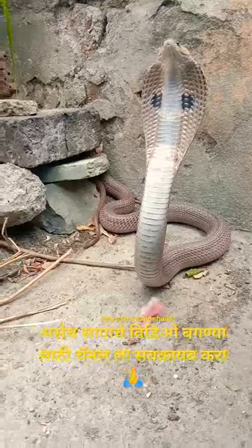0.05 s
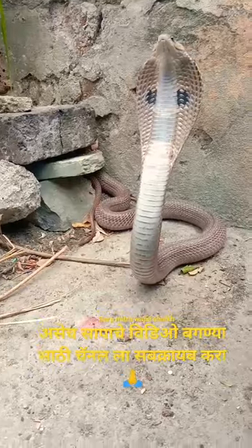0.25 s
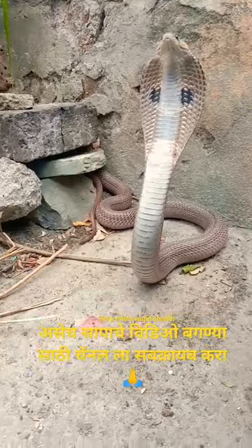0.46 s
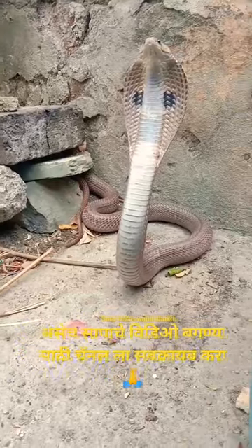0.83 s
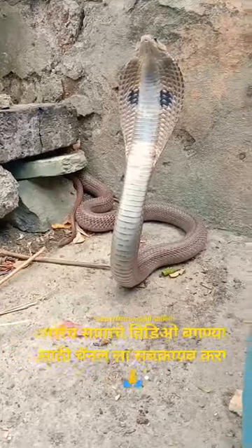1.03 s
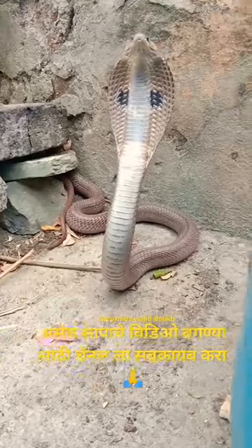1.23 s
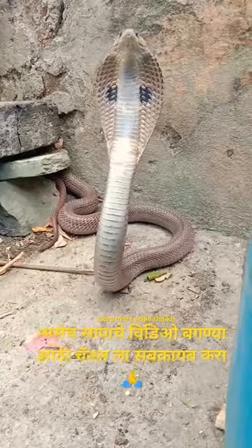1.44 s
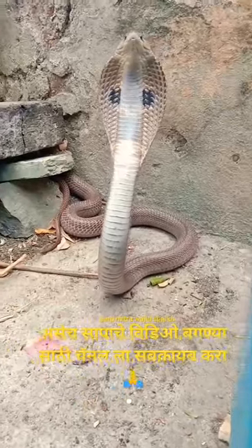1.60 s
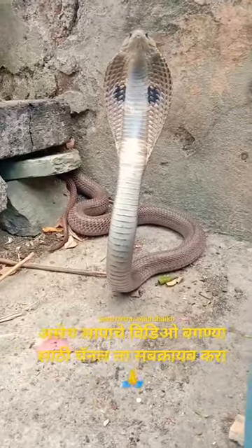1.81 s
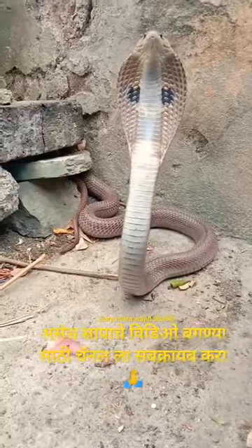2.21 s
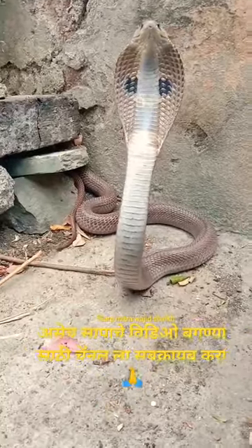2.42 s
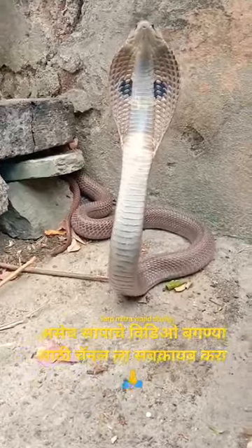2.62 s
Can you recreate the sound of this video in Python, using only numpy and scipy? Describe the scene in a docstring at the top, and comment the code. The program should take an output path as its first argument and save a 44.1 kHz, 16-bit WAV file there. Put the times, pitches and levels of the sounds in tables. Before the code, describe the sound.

A snake's long, airy hiss swells with a hollow, sputtering rasp, then dies away. Short, high bird chirps run through it and just past its end, outdoors by a stone wall, over a faint distant drone.

```python
"""One long, surging hiss from a reared cobra in front of a stone wall, a small bird twittering through it.
The hiss is turbulent air ringing the snake's throat and airway: the throat resonance rises and falls
with the push, and the airway changes shape near the end. The bird's notes are short raspy glides,
echoed by the wall. Underneath lie a quiet yard, a far drone, soft bumps and tiny ticks."""
import sys
import numpy as np
from scipy import signal
from scipy.fft import rfft, irfft, next_fast_len
from scipy.io import wavfile
from scipy.ndimage import map_coordinates

SR = 44100
rng = np.random.default_rng(int(sys.argv[2]) if len(sys.argv) > 2 else 0)


def wrap_up_sound(samples):
    """Save the sound to the file named by the first command line argument, as 16-bit audio."""
    columns = np.atleast_2d(samples).T
    # keep every value between -1 and 1, then stretch to whole-number steps
    tamed = np.clip(columns, -1, 1)
    steps = np.round(tamed * 32767).astype(np.int16)
    wavfile.write(sys.argv[1], SR, steps)


N = 121275


def amp(db):
    """Decibels to gain."""
    return 10 ** (np.asarray(db) / 20)


def unit(x):
    """Scale to rms 1."""
    return x / np.sqrt(np.mean(x ** 2) + 1e-20)


def clock():
    """The time of every sample."""
    return np.arange(N) / SR


def curves(rows):
    """One automation curve for each column after the time."""
    times, *columns = np.transpose(rows)
    return [np.interp(clock(), times, column) for column in columns]


def swells(rows):
    """A gain curve of bell-shaped swells (t/s, half length/s, level/dB)."""
    return sum(amp(db) * np.exp(-((clock() - s) / half) ** 2) for s, half, db in rows)


def wobble(rate):
    """A smooth random curve, rate knots a second."""
    return map_coordinates(rng.standard_normal(8192), [clock() * rate], mode="wrap")


def filtered(x, response):
    """Shape x with a frequency response."""
    size = next_fast_len(N + SR // 2)
    return irfft(rfft(x, size) * response(np.fft.rfftfreq(size, 1 / SR)), size)[:N]


def noise(response):
    """Coloured noise of rms 1."""
    return unit(filtered(rng.standard_normal(N), response))


def colour(points):
    """An EQ curve through (f/Hz, level/dB) points on a log axis."""
    f, db = np.transpose(points)
    return lambda hz: amp(np.interp(np.log(hz + 1), np.log(f + 1), db))


def resonance(hz, centre, width):
    """Gain of a resonance with steep skirts."""
    return (hz * width) ** 2 / ((centre ** 2 - hz ** 2) ** 2 + (hz * width) ** 2)


def ringing_air(modes):
    """Noise ringing a set of resonances (f/Hz, width/Hz, relative level/dB)."""
    def response(hz):
        gains = [amp(db) * resonance(hz, f, width * np.sqrt(2)) ** 2 for f, width, db in modes]
        return np.sqrt(sum(gain ** 2 for gain in gains))
    return noise(response)


def glide(air, ratio):
    """Bend all resonances of the air by a moving pitch ratio."""
    return unit(map_coordinates(air, [np.cumsum(ratio)], mode="wrap"))


def yard():
    """Still outdoor air and a distant low drone."""
    # colour of the air: f/Hz, relative level/dB
    air_colour = [(25, -9), (70, -37), (130, 15.5), (300, -42), (900, 3), (1150, 2), (1900, -2),
                  (3200, 3.5), (3900, -6.5), (5000, 2), (7200, -31), (8000, -19), (10000, -12),
                  (11200, -45), (15500, -19)]
    # the drone's drift: t/s, level/dB
    drone_levels = [(.1, -71), (1.0, -74), (2.0, -70.5), (2.4, -77), (2.75, -78.5)]
    air = amp(-71) * noise(colour(air_colour))
    drone = amp(curves(drone_levels)[0]) * ringing_air([(150.7, 198, 0)])
    return air + drone


def bumps():
    """Soft low bumps of a hand-held microphone."""
    # handling bumps: t/s, half length/s, level/dB
    nudges = [(0.275, 0.025, -59), (0.913, 0.06, -60.5), (2.255, 0.054, -65.5)]
    return swells(nudges) * ringing_air([(93, 92, 0)])


def ticks(t60_s=0.07):
    """Tiny dry ticks: bands of noise that start sharply and die fast."""
    # ticks: t/s, level/dB, f/Hz
    hits = [(2.319, -75, 8000), (2.517, -66, 2500), (2.558, -71, 8500), (2.609, -69, 2500)]
    t = clock()
    return sum((t > s) * amp(db - 60 * np.abs(t - s) / t60_s) * ringing_air([(hz, hz / 2, 0)])
               for s, db, hz in hits)


def wall(x, wall_db, direct_db=-4, t60_s=0.14, delay_s=0.00074):
    """A sound together with the short scattered answer of stone wall and ground."""
    t = np.arange(SR // 3) / SR
    scatter = rng.standard_normal(len(t)) * amp(-60 * t / t60_s) * (t > delay_s)
    answer = signal.fftconvolve(x, scatter)
    answer *= np.linalg.norm(x) / np.linalg.norm(answer)
    return amp(direct_db) * np.pad(x, (0, len(t) - 1)) + amp(wall_db) * answer


def sing(notes, wall_db, arch_hz=149, edge_s=0.0063):
    """Short arched glides, raspy in pitch and level, each answered by the wall."""
    song = np.zeros(N + SR)
    rasp_hz, rasp_db = 470 * wobble(800), 4.5 * wobble(400)  # at roughness 1
    for s, length, start_hz, end_hz, db, rough in notes:
        t = np.arange(int(length * SR)) / SR
        progress = t / length
        at = round(s * SR) + np.arange(len(t))
        arch = arch_hz * (np.sin(np.pi * progress) - .5)
        hz = start_hz + (end_hz - start_hz) * progress + arch + rough * rasp_hz[at % N]
        gate = np.sin(np.pi / 2 * np.clip(np.minimum(t, length - t) / edge_s, 0, 1))
        tone = amp(rough * rasp_db[at % N]) * np.sin(2 * np.pi * np.cumsum(hz) / SR)
        note = wall(amp(db) * unit(gate * tone), wall_db)
        song[at[0]:][:len(note)] += note
    return song[:N]


def bird(chirp_start_hz=3874, chirp_end_hz=4825, chirp_rough=.25):
    """High raspy twitters and four lower, clearer chirps that share one rising glide."""
    # twitters: t/s, length/s, start f/Hz, end f/Hz, level before the wall/dB, roughness
    twitters = [(0.211, 0.042, 5610, 5900, -58, 0.56), (0.394, 0.0089, 5230, 5700, -52, 0.63),
                (0.561, 0.048, 5210, 5270, -55, 0.4), (0.656, 0.018, 5550, 5810, -53, .5),
                (0.863, 0.023, 6000, 6630, -60.5, 0.77), (0.956, 0.025, 5460, 7000, -51.5, 0.75),
                (1.054, 0.024, 5590, 7100, -49, 0.4), (1.323, 0.018, 7300, 7080, -57, 0.15),
                (1.349, 0.012, 5390, 5310, -42, 0), (1.509, 0.05, 6490, 6110, -54, 0.6),
                (1.69, 0.036, 6530, 6040, -56.5, 0.6), (1.869, 0.04, 6730, 6310, -51, 0.49),
                (1.998, 0.017, 6600, 6880, -54, 0.2), (2.107, 0.028, 6370, 6720, -57.5, 0.31),
                (2.211, 0.038, 5896, 6150, -55.5, 0.17), (2.226, 0.032, 6570, 5040, -55.5, 0.58),
                (2.303, 0.036, 3250, 3790, -71, .7), (2.326, 0.033, 7080, 5900, -62, 1.17),
                (2.412, 0.032, 6380, 6330, -58, 0.53), (2.44, 0.032, 6650, 5170, -54, 0.89),
                (2.452, 0.042, 5000, 5140, -55.5, 0.16), (2.595, 0.11, 2763, 2820, -74, 0.27),
                (2.655, 0.083, 8280, 8520, -82, 0.26)]
    # chirps: t/s, length/s, level before the wall/dB
    calls = [(1.258, 0.065, -48.5), (1.438, .085, -49.5), (1.636, .065, -44.5), (1.812, 0.057, -43)]
    chirps = [(s, length, chirp_start_hz, chirp_end_hz, db, chirp_rough) for s, length, db in calls]
    return sing(twitters, wall_db=2) + sing(chirps, wall_db=-1)


def eddies(air, depth_db=6, width_hz=100, life_s=.14, half_depth_hz=11000):
    """Narrow peaks and hollows that come and go in the turbulence, shallower in the treble."""
    spectra = signal.stft(air, SR, nperseg=1024)[2]
    band, frame = np.indices(spectra.shape)
    hz, t = band * SR / 1024, frame * 512 / SR
    field = map_coordinates(rng.standard_normal((400, 64)), [hz / width_hz, t / life_s], mode="wrap")
    ripple_db = depth_db / (1 + (hz / half_depth_hz) ** 2) * np.tanh(field)
    return unit(signal.istft(spectra * amp(ripple_db), SR, nperseg=1024)[1][:N])


def body():
    """Puffs of air through the snake's low body resonances."""
    # puffs: t/s, half length/s, level/dB
    puffs = [(.64, 0.059, -61.5), (.83, 0.049, -56), (.995, 0.05, -58.5), (1.13, 0.042, -70.5),
             (1.255, 0.049, -58.5), (1.35, .03, -55.5), (1.485, 0.049, -52.5), (1.71, 0.11, -57.5),
             (1.86, 0.031, -59), (2.01, 0.082, -65.5)]
    # body resonances: f/Hz, width/Hz, relative level/dB
    modes = [(213, 21.5, -10), (327, 125, -5.5), (406.4, 48, -10.5)]
    return swells(puffs) * ringing_air(modes)


def mouth():
    """A thin hiss at the mouth, strongest as the air starts."""
    # mouth hiss: t/s, level/dB
    levels = [(.08, -61.5), (.35, -62.5), (.6, -107), (1.0, -85), (1.4, -70), (2.2, -100)]
    return amp(curves(levels)[0]) * noise(lambda hz: resonance(hz, centre=5500, width=2560) ** 4)


def fizz(flutter_db=.9):
    """Bright, fluttering fizz on top of the hiss."""
    # colour of the fizz: f/Hz, relative level/dB
    fizz_colour = [(1200, 3.5), (3600, -3), (6700, -22), (7300, -10.5), (7700, 2.5), (8900, -5), (10400, 7),
                   (11200, 0.5), (12200, 7), (13500, 3), (15500, 7)]
    return amp(flutter_db * wobble(rate=35)) * eddies(noise(colour(fizz_colour)))


def airway(close_mid_s=1.454, close_length_s=0.44, wander=.009):
    """Air rings the open airway, wandering in pitch, then crossfades to the closing shape."""
    # open airway: f/Hz, width/Hz, relative level/dB
    open_modes = [(1780, 170, -7.5), (2154, 360, -2), (2492, 210, 0.5), (2950, 370, -5), (3384, 73, -2),
                  (3900, 780, -12), (4196, 140, -6), (4780, 290, -3), (5140, 170, -4), (5415, 490, 0.5),
                  (5880, 370, -8), (6510, 450, -14.5)]
    # closing airway: f/Hz, width/Hz, relative level/dB
    closing_modes = [(1280, 76, -10.5), (2014, 530, -13.5), (2482, 270, -2), (2910, 47, -8),
                     (3250, 270, -6.5), (4167, 130, -6), (4880, 890, -6), (5677, 460, -1),
                     (6200, 340, -8.5), (6760, 170, -13.5)]
    turn = np.pi / 2 * np.clip((clock() - close_mid_s) / close_length_s + .5, 0, 1)
    wide = glide(ringing_air(open_modes), 1 + wander * wobble(rate=9))
    return eddies(np.cos(turn) * wide + np.sin(turn) * ringing_air(closing_modes))


def upper_throat():
    """Turbulence in the throat's upper pair of resonances, which bend together."""
    # the pair before bending: f/Hz, width/Hz, relative level/dB
    modes = [(1116, 41, -4.5), (1424, 144, 4)]
    # its movement: t/s, pitch ratio, level/dB
    bends = [(.1, 1.03, -79.5), (.3, 1.005, -64.5), (.4, 0.95, -67), (.48, 0.99, -53.5), (.7, 0.96, -58),
             (.775, 1.02, -50), (.83, 1, -60), (1.03, 1.07, -65), (1.15, 1.09, -66.5), (1.42, 1.04, -66),
             (1.6, 1.06, -84), (1.95, 0.94, -63), (2.12, 1.11, -83.5)]
    ratio, db = curves(bends)
    return amp(db) * eddies(glide(ringing_air(modes), ratio))


def throat(width_hz=270, echo_s=0.00672, echo_gain=0.24):
    """Turbulence in the throat's first resonance, rippled by the echo off the wall."""
    # the resonance surging with the push: t/s, f/Hz, level/dB
    surges = [(.1, 574, -76), (.24, 556, -62.5), (.37, 593, -57.5), (.46, 566, -60), (.54, 658, -48),
              (.65, 670, -52), (.705, 663, -64.5), (.77, 705, -48), (.87, 740, -54.5), (.97, 710, -51.5),
              (1.045, 773, -66.5), (1.1, 750, -51), (1.16, 760, -51.5), (1.225, 800, -58), (1.28, 826, -46),
              (1.36, 808, -48.5), (1.43, 760, -55.5), (1.505, 800, -46), (1.58, 650, -63.5),
              (1.67, 598, -53.5), (1.78, 523, -57.5), (1.91, 527, -54.5), (1.99, 570, -67), (2.2, 530, -86)]
    centre_hz, db = curves(surges)
    hz, t, spectra = signal.stft(rng.standard_normal(N), SR, nperseg=1024)
    gain = resonance(hz[:, None], np.interp(t, clock(), centre_hz), width_hz) ** 2
    air = signal.istft(spectra * gain, SR, nperseg=1024)[1][:N]
    echoed = filtered(air, lambda f: 1 + echo_gain * np.exp(-2j * np.pi * f * echo_s))
    return amp(db) * eddies(unit(echoed))


def cobra(airway_trim_db=4.5, fizz_trim_db=5, sputter_db=1.07):
    """One sputtering air stream: sustained in the airway, surging in the throat, puffing in the body."""
    # strength of the push, before the trims: t/s, airway level/dB, fizz level/dB
    push = [(.09, -68, -77), (.14, -60.5, -77), (.22, -65.5, -74), (.33, -59.5, -70.5), (.41, -58, -71),
            (.5, -53.5, -66), (1.02, -52.5, -65.5), (1.12, -51, -65), (1.26, -50.5, -65.5),
            (1.48, -48.5, -63.5), (1.7, -50, -64.5), (1.92, -48, -63), (2.01, -54.5, -65.5),
            (2.11, -63.5, -74), (2.19, -87, -94)]
    airway_db, fizz_db = curves(push)
    hiss = amp(airway_db + airway_trim_db) * airway()
    hiss += throat() + upper_throat() + body() + mouth()
    hiss += amp(fizz_db + fizz_trim_db) * fizz()
    return hiss * amp(sputter_db * wobble(rate=110))


def scene():
    """Snake, bird and yard at one microphone."""
    return (cobra() + bird() + yard() + bumps() + ticks())[None]


def record(dry, start_s=0.081, fade_s=0.012, top_hz=15600):
    """The sound opens after a moment of silence; the microphone has one narrow notch and a band limit."""
    opening = np.clip((clock() - start_s) / fade_s, 0, 1)
    notch = lambda hz: amp(-12 * np.exp(-((hz - 7300) / 120) ** 2))
    return filtered(dry[0] * opening, lambda hz: notch(hz) * (hz < top_hz))[None]


dry = scene()
out = record(dry)
wrap_up_sound(out)
```